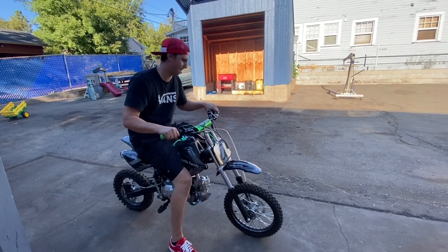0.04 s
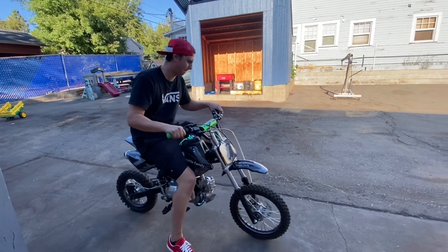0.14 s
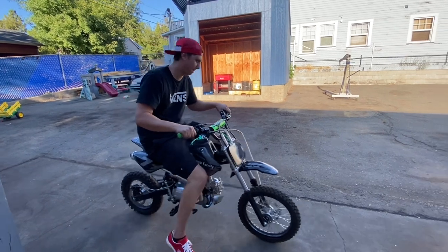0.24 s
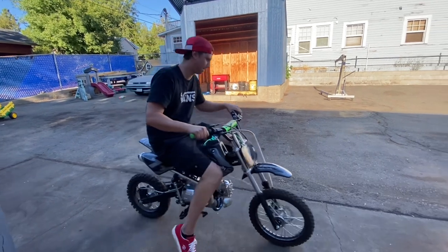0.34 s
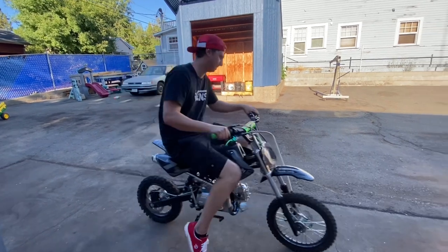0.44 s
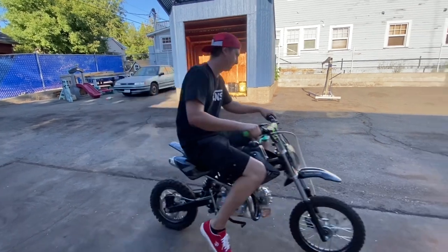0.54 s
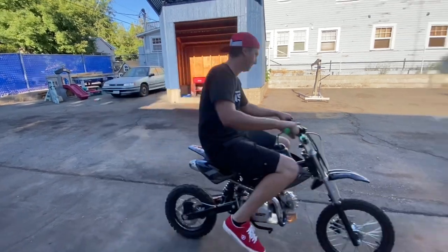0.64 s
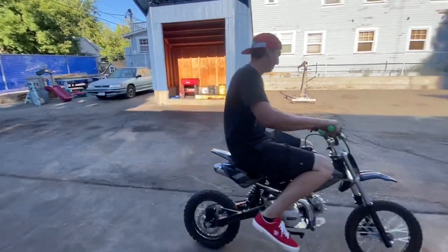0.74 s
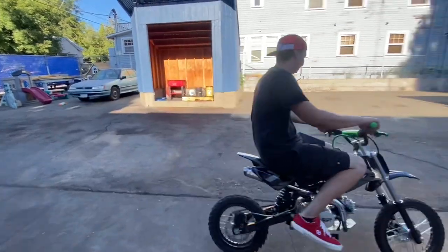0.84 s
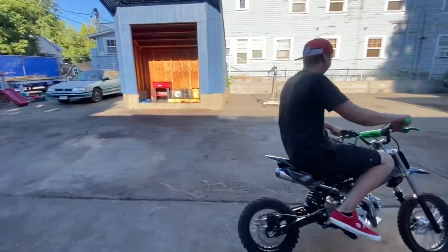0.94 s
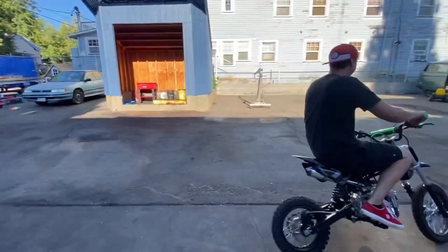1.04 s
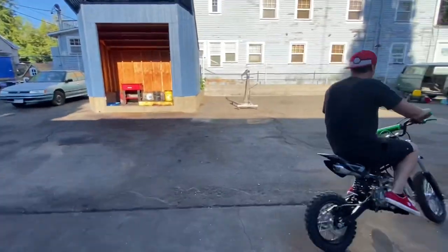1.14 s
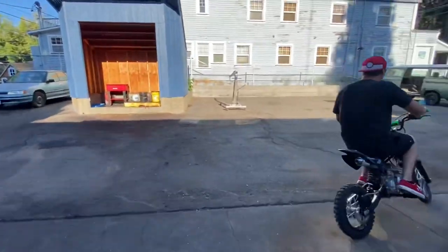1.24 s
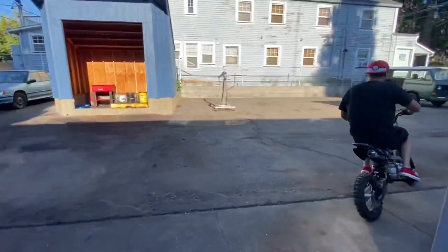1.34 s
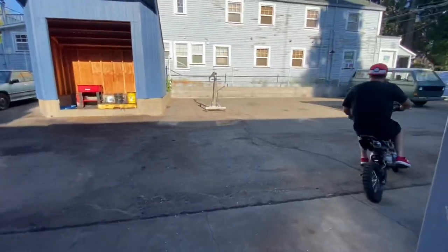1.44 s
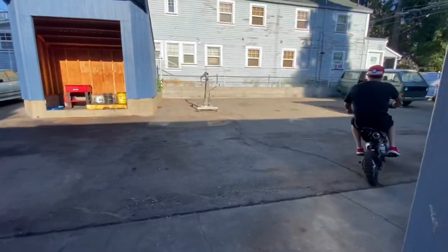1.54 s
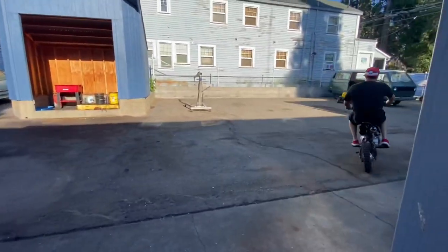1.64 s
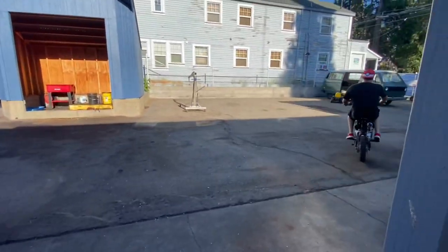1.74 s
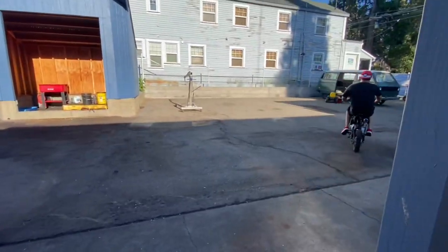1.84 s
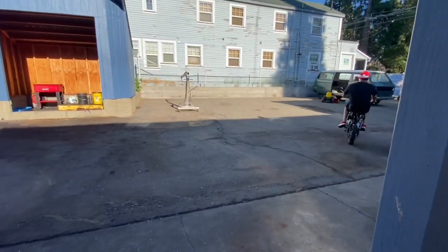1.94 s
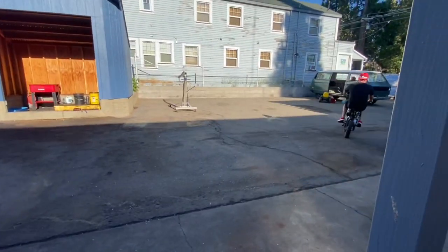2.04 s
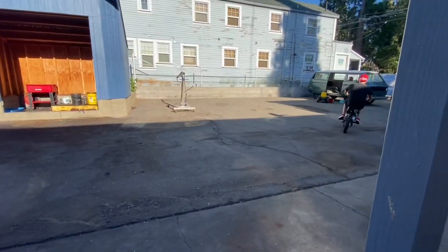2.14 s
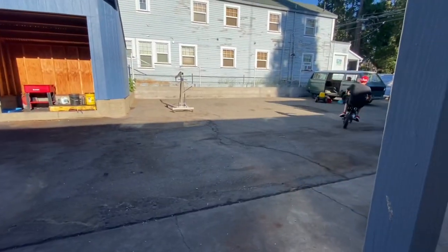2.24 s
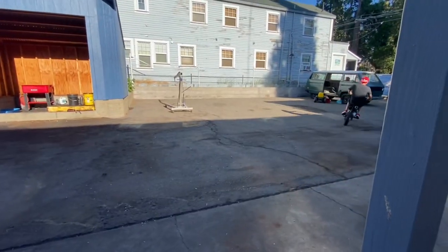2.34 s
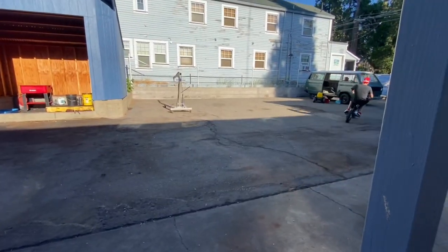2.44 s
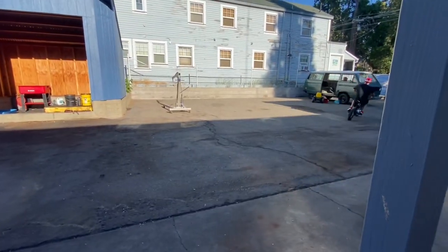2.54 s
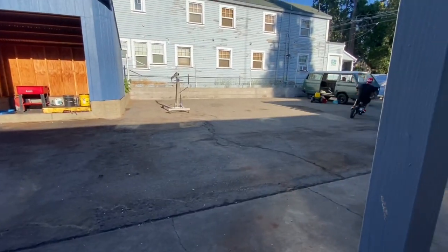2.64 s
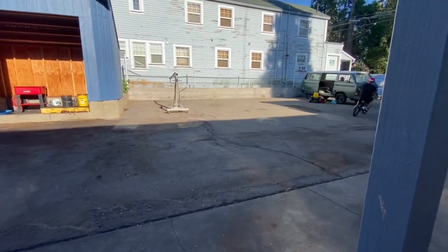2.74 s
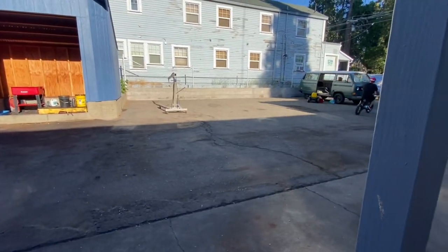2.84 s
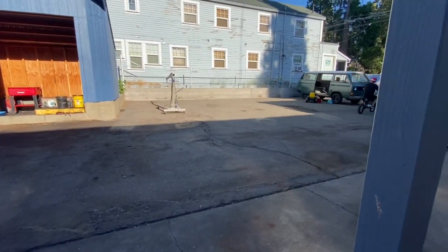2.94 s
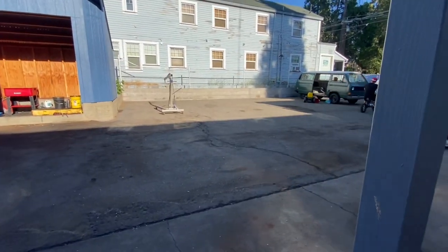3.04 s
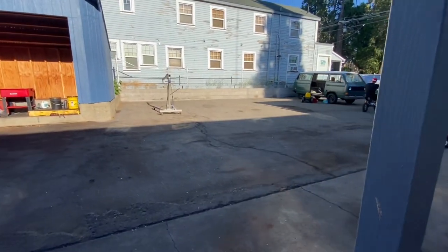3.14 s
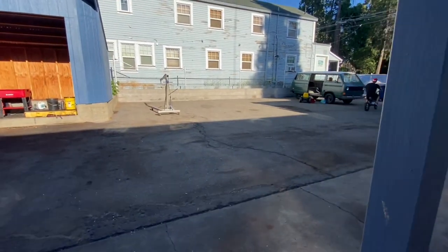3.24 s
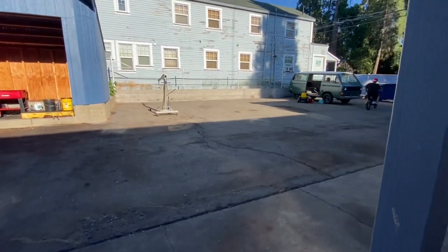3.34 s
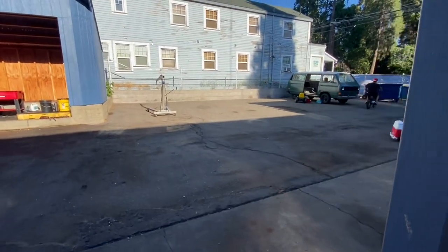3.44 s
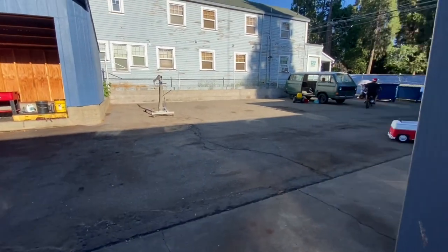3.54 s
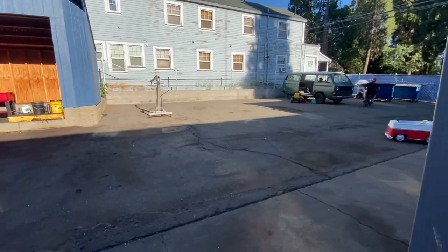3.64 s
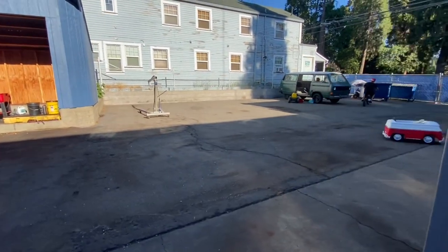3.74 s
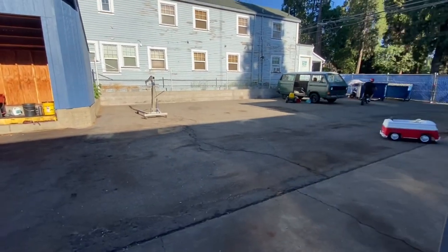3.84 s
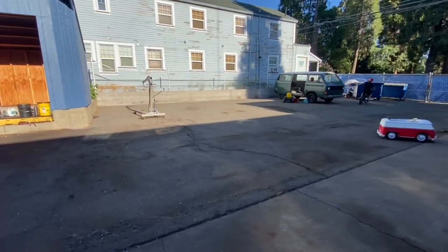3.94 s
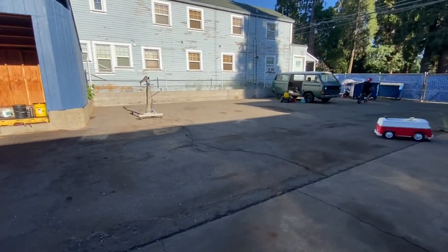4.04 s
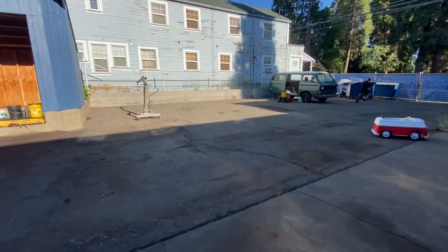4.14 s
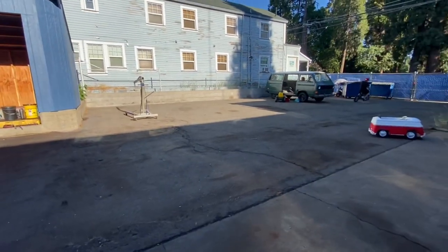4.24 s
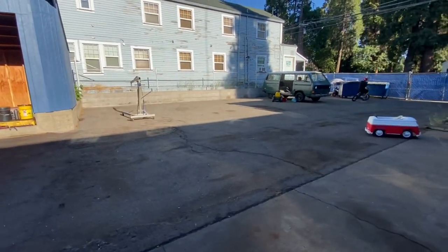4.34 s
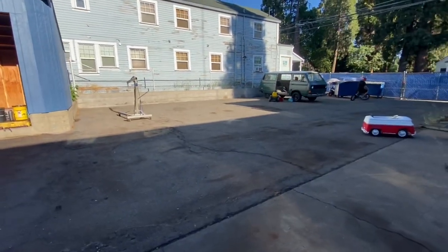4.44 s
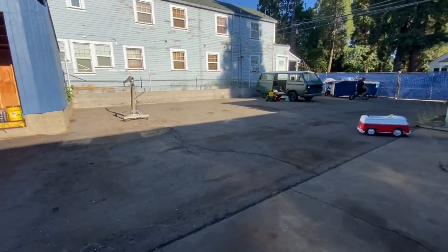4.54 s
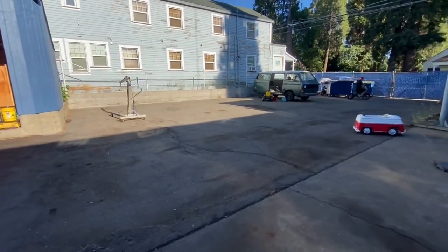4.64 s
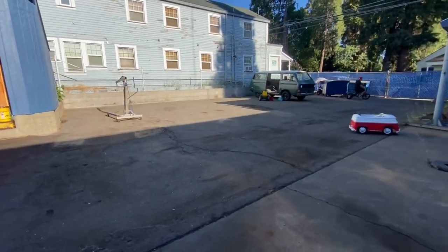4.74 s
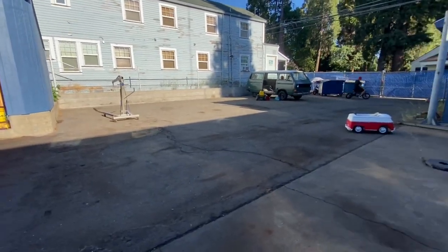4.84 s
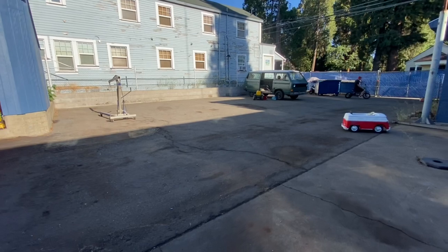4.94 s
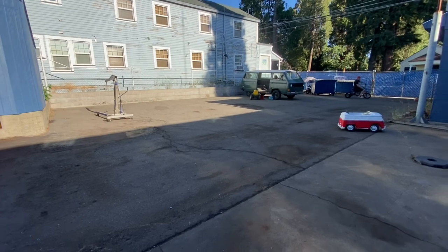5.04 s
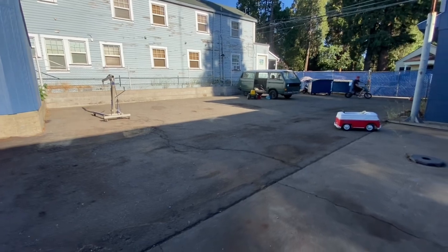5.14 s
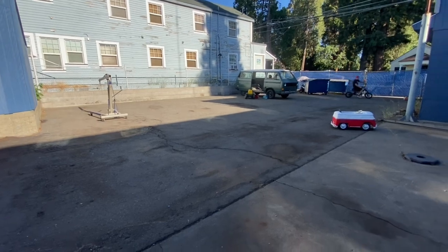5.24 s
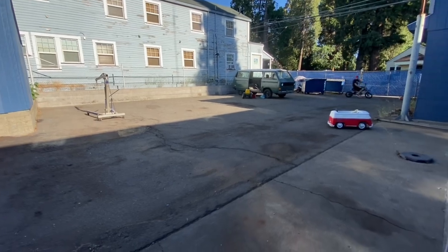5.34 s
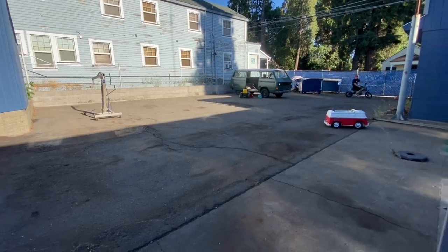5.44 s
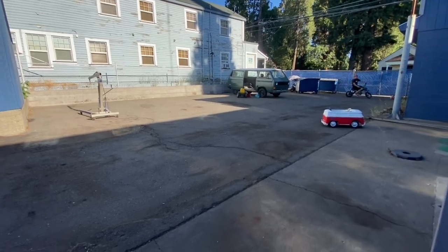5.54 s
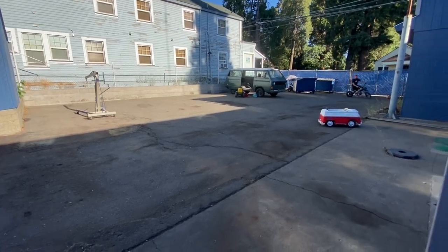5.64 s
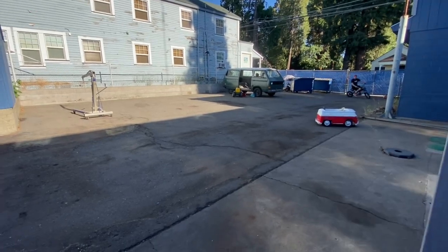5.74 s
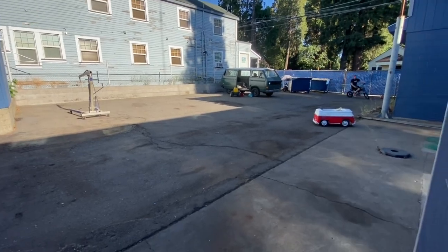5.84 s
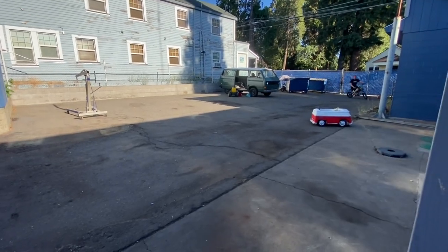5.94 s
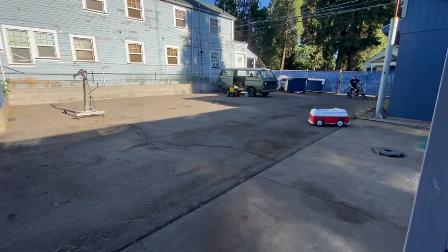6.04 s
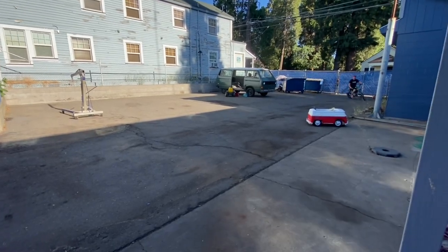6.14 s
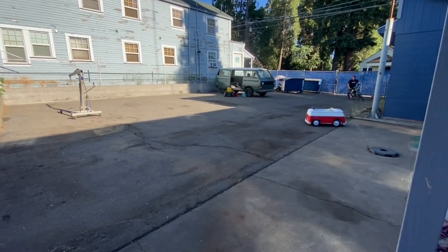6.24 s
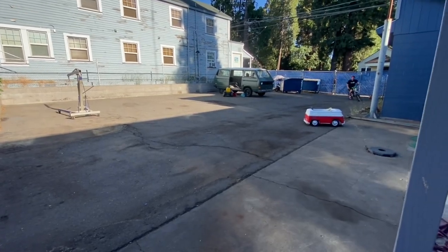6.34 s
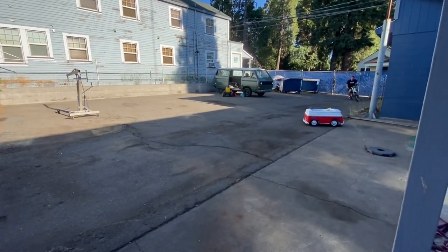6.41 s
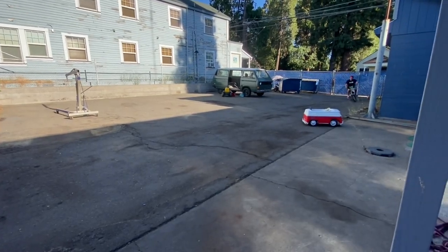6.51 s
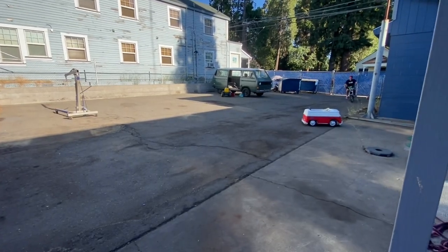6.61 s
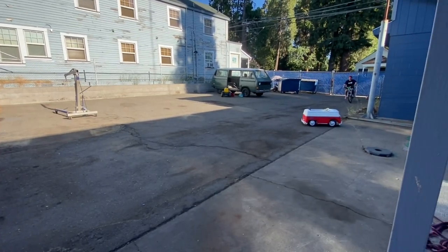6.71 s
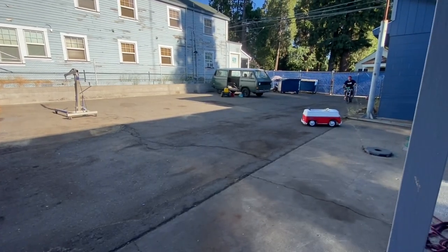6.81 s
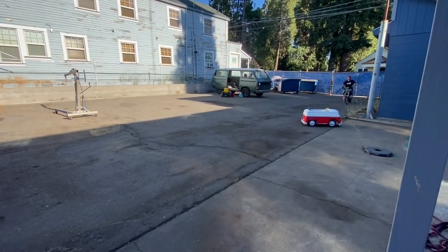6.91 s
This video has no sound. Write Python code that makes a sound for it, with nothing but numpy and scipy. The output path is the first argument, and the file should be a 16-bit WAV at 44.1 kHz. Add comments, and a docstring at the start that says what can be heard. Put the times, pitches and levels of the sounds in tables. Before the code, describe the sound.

A small single-cylinder motorbike crackles loudly away across a paved yard, fades to a lumpy distant idle, then faintly opens up again.

```python
"""The crackle of a small single-cylinder motorbike pulling away across a paved yard between buildings; it coasts,
idles through a turn and opens up again. Each firing rings muffler and pipe and spits a crack of gas noise.
Delayed, filtered copies give the pipe's short dull echoes, a bright one off the paving and dull ones off the walls.
Chain and tyre whirr, chain rattles and scuffs near the microphone are shaped noise; late on, two sine partials
swell as a second engine. Low resonant noise is the yard's rumble. The microphone has two ports, left and right."""
import sys
import numpy as np
from scipy import signal
from scipy.fft import rfft, irfft
from scipy.io import wavfile
from scipy.ndimage import uniform_filter1d

SR = 44100
rng = np.random.default_rng(int(sys.argv[2]) if len(sys.argv) > 2 else 0)


def dump_mix(stems):
    """Bounce the given channels to the path in sys.argv[1] as a 16-bit WAV at rate SR."""
    frames = np.atleast_2d(stems).T  # one column per channel
    limited = np.clip(frames, -1, 1)  # hard clip at full scale
    pcm = np.round(limited * 32767).astype(np.int16)
    wavfile.write(sys.argv[1], SR, pcm)


N = 307377
TIME = np.arange(N) / SR

# engine in steady running, one list per stretch, going out and then facing: (time [s], firing rate [1/s])
FIRING_RATE = [
    [(0.0, 40.38), (0.195, 42.08), (0.483, 38.59), (0.729, 39.13), (0.932, 44.21), (1.353, 61.36),
     (1.575, 49.27), (1.753, 48.46), (1.912, 41.37), (2.062, 44.07), (2.205, 36.95), (2.469, 38.62),
     (2.641, 37.37), (3.366, 28.74), (3.64, 26.65)],
    [(6.21, 19), (6.3, 28), (6.36, 28), (6.42, 23), (6.5, 23), (6.6, 25), (6.74, 25), (6.82, 28.5),
     (6.97, 28)],
]
FIRST_FIRING_S = (.0078, 6.213)   # one per stretch
FIRING_SPREAD_DB, FIRING_JITTER_MS = (.6, 1.8), .03   # spread per stretch: even going out, lumpy when facing
# click strength of the intake gulp about half a cycle after each firing, per stretch; a firing has 0.64
INTAKE = (0.033, 0.2)
# firings that stand out of the lumpy idle: (time [s], level before POP_GAIN_DB [dB])
IDLE_POPS = [(3.661, -42.5), (3.728, -20), (3.793, -42), (3.945, -27.5), (4.115, -33), (4.177, -29),
             (4.256, -44), (4.44, -28), (4.577, -28), (4.719, -32), (4.802, -51), (4.86, -34), (5.022, -59),
             (5.076, -28), (5.222, -31), (5.373, -28.5), (5.654, -29.5), (6.067, -24)]
POP_GAIN_DB = 32.5
# the rider's hand: (time [s], throttle opening [0 shut, 1 full])
THROTTLE = [(0, 0.89), (.5, 0.81), (1.03, 0.91), (1.365, 0.72), (1.44, 0), (1.59, 0.18), (1.62, 0.46),
            (1.72, 0.39), (1.84, 0.52), (1.92, 0.82), (2.01, 1.05), (2.075, 0.89), (2.13, 0.24), (2.26, 0),
            (6.17, 0.46), (6.22, 0.59), (6.45, 0.72), (6.97, 0.89)]
# the ride across the yard: (time [s], loss through distance, before each voice's share [dB])
DISTANCE = [(0, -2.5), (1.4, -3.5), (2.0, 0.6), (2.4, 3), (2.7, 2.5), (3.0, 5), (3.4, 9.5), (3.55, 15.5),
            (3.7, 13), (4.1, 18), (5.2, 17.5), (5.7, 18.5), (6.1, 17.5), (6.4, 16.5), (6.6, 18),
            (6.75, 17.5), (6.97, 19)]
# direction of the bike at the microphone: (time [s], left minus right [dB], left lag [samples])
BEARING = [(0, 0.5, -3), (.5, -0.5, -4), (1, -1, 4.5), (1.5, -1, 6), (2.5, -1, 8), (4.5, -1.5, 7),
           (6.97, -1, 9.5)]
TURN_S = (1.044, 1.217)   # the bike swings from side-on to tail-on
TUNED_PER_S = 46.9   # above this firing rate the exhaust runs out of tune

# resonances, relative levels: (frequency [Hz], width [Hz], level [dB])
# muffler modes
THUD = [(138, 94, 6.5), (169.7, 54, 5.5), (222, 47, 1.5), (255.5, 26, 5)]
# low muffler mode stirred by uneven running and by the idle pops
BOOM = [(153, 32, -17)]
# pipe modes, then higher pipe modes
BARK = [(330, 260, 13.5), (379, 39, 17), (386, 236, 8)]
UPPER_BARK = [(467, 120, 7.5), (575, 170, -3)]
# lower outlet modes, upper outlet modes, bright edge of each crack
BURR = [(746, 234, 4.5), (985, 186, -0.5)]
RASP = [(630, 240, 5), (1089, 343, 14.5), (1690, 370, 10), (2650, 620, 2)]
CRACKLE = [(2140, 230, -5), (3600, 230, 1), (5100, 1300, -4)]
# chain and tyre whirr
WHIRR_MODES = [(1400, 220, 10), (1752, 70, 14), (3980, 1200, -3), (800, 280, -10.5)]
# left microphone port, which hears more lower treble and less middle
PORT_TILT = [(5650, 4300, -1.5), (1227, 4300, -4)]
# the yard's low resonances
RUMBLE_MODES = [(51.7, 9.3, -4.5), (77.3, 8.1, 3.5), (112.9, 18.6, -2), (212.1, 7, -8.5)]
# chain rattle
RATTLE_MODES = [(1350, 93, -1.5), (1500, 150, -.1)]
# swell of the low tones as they cross one resonance, a single row
ORDER_PEAK = (115.5, 60, 2.73)

# spectrum of escaping gas: (frequency [Hz], relative level per Hz [dB])
HISS_SPECTRUM = [(1060, -28), (1800, -6), (3290, -5.5), (8130, -26.5), (8750, -20.5), (9330, -28),
                 (10600, -15), (12100, -21.5), (13200, -41), (14900, -17), (16000, -34)]

# how each voice of the exhaust answers, one row of: (level with throttle shut [dB], gain at full throttle [dB],
# share of the distance loss [ratio], loss per firing a second out of tune [dB], gain side-on [dB],
# gain head-on [dB], gain at idle [dB])
THUD_RULE = (-24.5, 5, 1.04, 1.1, -4.5, 6.5, -10.5)
BOOM_RULE = (-13.5, -1, 1.04, 0, -4, -15.5, -19)
BARK_RULE = (-34.5, 15, 2.5, 0.93, 4.5, 16, -24)
UPPER_BARK_RULE = (-57.5, 20, 0.65, -1, 5, 5.5, -4)
BURR_RULE = (-53, 25.5, 1.5, 0.8, 2.5, 9.5, -0.5)
RASP_RULE = (-52.5, 34, 1.94, 0.26, -10, 10.5, 8.5)
CRACKLE_RULE = (-72.5, 36, 1.1, -1.2, -5.5, 14, -5)
# gas noise below 7 kHz, then above it (before SIZZLE_GAIN_DB)
HISS_RULE = (-50, 24, 1.14, -0.1, 0, 5.5, -4.5)
SIZZLE_RULE = (-60.5, 25.5, 2.05, -0.1, -4, 12, 4)
SIZZLE_GAIN_DB = 12.0
# same columns, one row for each of firing orders 1-4, before ORDER_GAIN_DB
ORDER_RULES = [(-58.5, 23.5, 0.57, -0.21, 1, -6, 0.0089), (-41.5, 12.5, 0.8, -0.31, 7.2, -10, 0),
               (-31, -3, 1, 0.54, 1.5, -1, 0), (-25.5, -12.5, 0.81, 0.95, 4, 9, 0)]
ORDER_GAIN_DB = -1.5

# share of rasp and hiss in cracks (0-1): throttle shut, open side-on at first, open tail-on, open facing the listener
CRACK_SHARE = (.04, .76, .96, .36)
# roughness (0-1): throttle open, shut, at idle, open facing the listener
ROUGHNESS = (.04, .07, 1, .65)
SHARPEN_S = .8   # the cracks sharpen over this time as the outlet comes round
ORDER_LAG_MS, MUFFLER_LAG_MS = 6.4, 1.5   # after the firing: the low tones crest, the muffler answers
CRACK_MS, RASP_MS, UNEVEN_MS = 1.3, 1.2, 46.0   # burst decay of hiss, rasp and uneven running
BURR_CLEAN = 1.2   # the lower outlet modes are driven more cleanly than the hiss
HISS_CRACK = 0.84   # the hiss keeps more steady flow between cracks than the rasp
OWN_HISS = .09   # share of the gas noise power that differs between the microphone ports

WHIRR_DB, WHIRR_FADES_S, WHIRR_DB_PER_S = -50, 1.95, 5   # level, start and rate of fading far off
WHIRR_WAVER_DB, WHIRR_WAVER_HZ = 3, 4   # each resonance wavers on its own

# rumble of the yard: (time [s], level [dB])
RUMBLE_LEVEL = [(1.8, -31.5), (2.4, -48), (3.15, -34), (3.5, -31), (4.1, -38.5), (4.7, -36.5), (5.1, -41.5),
                (5.6, -36), (5.9, -39)]
AIR_DB = -96

# bright echo off the paving, sooner as the bike draws off: (time [s], delay [ms], level [dB])
GROUND_ECHO = [(0, 1.9, 0), (.27, 2.01, 4), (.5, 2.36, 2), (.8, 2.62, 1.5), (1.0, 2.13, -2.5),
               (1.1, 1.83, 0), (1.2, 1.143, 0.5), (1.36, 0.87, -3), (1.6, .85, -8), (2.08, 0.79, -2.5),
               (2.3, 0.76, -4), (3.6, 0.74, -1.5), (6.2, 0.41, -6), (6.97, 0.38, -18)]
GROUND_BAND_HZ, GROUND_SKEW_MS = (900, 8000), .05   # the right side hears it later
# two short dull echoes of each firing, the first from the pipe, with moving delays:
# (time [s], first delay [ms], first level before pan [dB], second delay [ms], second level before pan [dB])
SHORT_ECHOES = [(0, 4.63, -5, 11.5, -5.5), (.15, 4.8, -2, 11.1, -1.5), (.3, 4.95, -8.5, 11.8, -4),
                (.55, 8.7, -7, 10.4, -11), (.8, 6.06, -11, 10.5, -14), (1.1, 7.45, -10, 10.3, -6),
                (1.38, 4.65, -14, 10.5, 2), (1.6, 4.57, -1, 10.26, 0), (2.05, 4.72, -3, 10.11, -2),
                (2.3, 5.3, -6.5, 9.9, -4.5), (2.9, 4.93, -3, 8.4, -8.5), (3.5, 5.36, -6, 8.2, -22),
                (6.2, 2.45, -4.5, 6.8, -4), (6.45, 3.5, -13.5, 10.6, -7), (6.7, 3.7, -5, 6.5, -2.5),
                (6.97, 5.5, -1, 9.1, 4)]
SHORT_ECHO_CUT_HZ, SHORT_ECHO_SKEW_MS = 1700, 0.24   # the right side hears them later
# wall echoes: (left delay [ms], right delay [ms], level before pan [dB])
WALL_ECHOES = [(17.23, 17, -11.5), (30.84, 37, -4), (57.95, 53, -8.5), (94.9, 87, -17.5)]
WALL_CUT_HZ = 1800
ECHO_PAN_DB = -3   # left minus right: short echoes and walls are stronger on the right

# chain rattling briefly as the bike slows: (time [s], level before RATTLE_GAIN_DB [dB])
RATTLES = [(3.447, -50), (3.6031, -45), (3.7375, -51), (3.9203, -50), (4.0804, -54), (4.3729, -55)]
RATTLE_GAIN_DB, RATTLE_MS = -4.0, 23   # trim and decay
# scuffs near the microphone: (time [s], level at crest [dB], low edge [Hz], high edge [Hz], rise [ms])
SCUFFS = [(4.752, -49, 600, 3330, 15.5), (5.167, -48, 1460, 12100, 6.9), (5.44, -51, 599, 3460, 22),
          (5.588, -46, 385, 1470, 2.9)]
# second engine far off: (time [s], hum frequency [Hz], hum level [dB], third partial level [dB])
HUM = [(5.25, 51.05, -61, -74), (5.61, 60.2, -40, -69), (5.79, 67.7, -32, -70), (6.1, 67.5, -30.5, -48.5),
       (6.74, 70.1, -33.5, -52), (6.97, 72, -29.5, -50)]
CUTOFF_HZ = 16000


def from_db(db):
    """Decibels to gain."""
    return 10 ** (np.asarray(db) / 20)


def rms_one(x):
    """Scale to rms 1."""
    return x / np.sqrt(np.mean(x ** 2) + 1e-20)


def in_time(rows):
    """Columns of a table at every sample."""
    s, *columns = np.transpose(rows)
    return [np.interp(TIME, s, c) for c in columns]


def delayed(x, ms):
    """A signal heard later by a fixed or moving delay."""
    return np.interp(TIME - ms / 1000, TIME, x, left=0)


def resonate(x, modes, sign=-1):
    """Parallel two-pole resonances; alternating signs fill the valleys, equal signs sharpen the onset."""
    out = 0
    for k, (hz, width_hz, db) in enumerate(modes):
        r = np.exp(-np.pi * width_hz / SR)
        top = (1 - r * r) / 2 * from_db(db) * sign ** k
        out = out + signal.lfilter([top, 0, -top], [1, -2 * r * np.cos(2 * np.pi * hz / SR), r * r], x + 1e-18)
    return out


def rung(x, db, modes, reference, sign=1):
    """Modes driven at a level in dB, whatever their widths; white reference noise sets the scale."""
    return resonate(from_db(db) * x, modes, sign) / np.std(resonate(reference, modes, sign))


def butter(x, hz, kind, order=2):
    """Butterworth filter."""
    return signal.sosfilt(signal.butter(order, hz, kind, fs=SR, output="sos"), x)


def colour(x, spectrum):
    """Impose a spectrum drawn on a log-frequency axis, ringing only after each click; white noise keeps rms 1."""
    hz, db = np.transpose(spectrum)
    bins = np.maximum(np.arange(N // 2 + 1) * SR / N, 1)
    magnitude = rms_one(from_db(np.interp(np.log(bins), np.log(hz), db)))
    # folding the cepstrum gives minimum phase
    cepstrum = irfft(np.log(magnitude), N)
    cepstrum[1:N // 2 + 1] *= 2
    cepstrum[N // 2 + 1:] = 0
    return irfft(rfft(x) * np.exp(rfft(cepstrum)), N)


def controls():
    """What drives every voice: constant, throttle, distance, detuning, side-on, facing, idling; one row each."""
    outward, facing = FIRING_RATE
    per_s, = in_time(outward + facing)
    throttle, = in_time(THROTTLE)
    distance_db, = in_time(DISTANCE)
    detuning = np.maximum(per_s - TUNED_PER_S, 0)
    side_on = np.interp(TIME, TURN_S, (1, 0))
    head_on = TIME > facing[0][0]
    idling = uniform_filter1d(1. * (TIME > outward[-1][0]) * (TIME < facing[0][0]), size=2000)
    return np.array([np.ones(N), throttle, -distance_db, -detuning, side_on, head_on, idling])


def character(throttle, idling):
    """Crack share and roughness: open throttle cracks, shut it turns soft, at idle all is lumpy noise."""
    facing = TIME > FIRING_RATE[1][0][0]
    opened = np.clip(2 * throttle, 0, 1)
    shut, first, tail_on, head_on = CRACK_SHARE
    crack = np.where(facing, head_on, np.interp(TIME, (0, SHARPEN_S), (first, tail_on)))
    share = shut + opened * (crack - shut)
    even, soft, lumpy, open_facing = ROUGHNESS
    rough = soft + opened * (np.where(facing, open_facing, even) - soft)
    return share * (1 - idling), rough + idling * (lumpy - rough)


def firings(orders_db):
    """Clicks of even power per second at each firing and intake gulp, and the low orders as clean tones."""
    clicks, tones = np.zeros(N), np.zeros(N)
    peak_hz, peak_width_hz, peak_db = ORDER_PEAK
    for rows, first_s, intake, spread_db in zip(FIRING_RATE, FIRST_FIRING_S, INTAKE, FIRING_SPREAD_DB):
        per_s, = in_time(rows)
        cycles = np.cumsum(per_s) / SR
        cycles = cycles - np.interp(first_s, TIME, cycles)
        running = (TIME >= rows[0][0]) & (TIME < rows[-1][0])
        for late_cycles, strength in ((0, 0.64), (.52, intake)):
            new_cycle = np.diff(np.floor(cycles - late_cycles), prepend=-1) > 0
            at = np.flatnonzero(new_cycle & running)
            chance = rng.standard_normal((len(at), 2))
            jitter = (chance[:, 0] * FIRING_JITTER_MS * SR / 1000).astype(int)
            at = np.clip(at + jitter, 0, N - 1)
            clicks[at] = strength * from_db(spread_db * chance[:, 1]) * np.sqrt(SR / per_s[at])
        fade = uniform_filter1d(running * 1., size=2000, mode="nearest")
        crest = cycles - per_s * ORDER_LAG_MS / 1000
        for order, db in enumerate(orders_db, start=1):
            swell_db = peak_db / (1 + (2 * (order * per_s - peak_hz) / peak_width_hz) ** 2)
            level = np.sqrt(2) * from_db(db + swell_db + ORDER_GAIN_DB)
            tones += fade * level * np.cos(2 * np.pi * order * crest)
    return clicks, tones


def bursts(clicks, decay_ms, share):
    """Loudness contour of escaping gas: a sharp decaying burst per firing over a steady flow."""
    r = np.exp(-1000 / (decay_ms * SR))
    burst = signal.lfilter([np.sqrt(1 - r * r)], [1, -r], clicks + 1e-18)
    return np.sqrt(share * burst ** 2 + 1 - share)


def muffler(drive, uneven, thud_db, boom_db, flow):
    """Firings, uneven flow and idle pops ring the muffler's low modes."""
    pops = np.zeros(N)
    for s, db in IDLE_POPS:
        pops[round(s * SR)] = from_db(db + POP_GAIN_DB)
    thud = rung(drive, thud_db, THUD, flow)
    boom = rung(uneven, boom_db, BOOM, flow)
    low = thud + boom + resonate(pops, BOOM + THUD, 0.55)
    low = butter(butter(low, 85, "high"), 300, "low", order=4)
    return delayed(low, MUFFLER_LAG_MS)


def pipe(drive, bark_db, upper_db, flow):
    """The same drive barks in the pipe's resonances, the higher ones in opposite sign."""
    bark = butter(rung(drive, bark_db, BARK, flow), [250, 520], "band", order=1)
    bark = butter(bark, 560, "low")
    return bark - butter(rung(drive, upper_db, UPPER_BARK, flow), [400, 700], "band", order=1)


def outlet(clicks, share, burr_db, rasp_db, crackle_db, flow):
    """Pressure fronts, then gated turbulence, ring the outlet's modes as burr, rasp and crackle."""
    front = np.sqrt(share) * clicks
    spit = rng.standard_normal(N) * bursts(clicks, RASP_MS, share)
    clean = np.clip(BURR_CLEAN * share, 0, .96)
    burr_drive = np.sqrt(clean) * clicks + np.sqrt(1 - clean) * spit
    burr = rung(burr_drive, burr_db, BURR, flow, -0.81)
    cracks = .93 * front + np.sqrt(1 - .86 * share) * spit
    rasp = rung(cracks, rasp_db, RASP, flow, -1) + rung(cracks, crackle_db, CRACKLE, flow)
    return butter(burr, [500, 1500], "band", order=1) + butter(rasp, 560, "high")


def gas_hiss(clicks, share, hiss_db, sizzle_db):
    """Each front is followed by a burst of turbulent gas noise, mostly alike at both ports."""
    front = np.sqrt(share) * clicks
    common, own = rng.standard_normal(N), rng.standard_normal((2, N))
    noise = np.sqrt(1 - OWN_HISS) * common + np.sqrt(OWN_HISS) * own
    gated = noise * bursts(clicks, CRACK_MS, HISS_CRACK * share)
    gas = colour(0.42 * front + gated, HISS_SPECTRUM)
    low, high = butter(gas, 7000, "low", order=4), butter(gas, 7000, "high", order=4)
    return from_db(hiss_db) * low + from_db(sizzle_db + SIZZLE_GAIN_DB) * high


def exhaust():
    """Firings and turbulent flow excite muffler, pipe and outlet; the low orders come as separate tones."""
    drivers = controls()
    rules = [THUD_RULE, BARK_RULE, UPPER_BARK_RULE, BURR_RULE, RASP_RULE, HISS_RULE, SIZZLE_RULE,
             BOOM_RULE, CRACKLE_RULE]
    levels_db = np.array(rules) @ drivers
    thud_db, bark_db, upper_db, burr_db, rasp_db, hiss_db, sizzle_db, boom_db, crackle_db = levels_db
    share, rough = character(drivers[1], drivers[-1])
    clicks, tones = firings(np.array(ORDER_RULES) @ drivers)
    flow = rng.standard_normal(N)
    uneven = rough * flow * bursts(clicks, UNEVEN_MS, 0.63)
    drive = np.sqrt(1 - rough ** 2) * clicks + uneven
    body = muffler(drive, uneven, thud_db, boom_db, flow) + pipe(drive, bark_db, upper_db, flow)
    rasp = outlet(clicks, share, burr_db, rasp_db, crackle_db, flow)
    return body + rasp + gas_hiss(clicks, share, hiss_db, sizzle_db), tones


def place(pair):
    """Level, colour and arrival difference between the two microphone ports."""
    pan_db, lag = in_time(BEARING)
    late = np.clip(np.arange(N) - np.round(lag).astype(int), 0, N - 1)
    left, right = np.broadcast_to(pair, (2, N))
    left = left + resonate(left, PORT_TILT)
    return np.array([left[late] * from_db(pan_db / 2), right * from_db(-pan_db / 2)])


def whirr():
    """Chain and tyres: noise in a few wavering resonances, half alike on both sides."""
    noise = rng.standard_normal(N) + rng.standard_normal((2, N))
    slow = butter(rng.standard_normal((len(WHIRR_MODES), N)), WHIRR_WAVER_HZ, "low")
    waver_db = WHIRR_WAVER_DB * rms_one(slow)
    level_db = WHIRR_DB - WHIRR_DB_PER_S * np.maximum(TIME - WHIRR_FADES_S, 0)
    ringing = sum(from_db(w) * resonate(noise, [mode]) for mode, w in zip(WHIRR_MODES, waver_db))
    return from_db(level_db) * rms_one(ringing)


def rumble():
    """Low noise in the yard's resonances, mostly alike on both sides, over faint air hiss."""
    mid, side = resonate(rng.standard_normal((2, N)), RUMBLE_MODES)
    low = rms_one(mid + 0.63 * side * [[1], [-1]]) * from_db(in_time(RUMBLE_LEVEL)[0])
    air = rms_one(butter(rng.standard_normal((2, N)), [300, 5000], "band", order=1))
    return low + from_db(AIR_DB) * air


def ground(pair):
    """Direct sound plus its bright echo off the paving, with a moving delay."""
    ms, db = in_time(GROUND_ECHO)
    bright = butter(pair, GROUND_BAND_HZ, "band", order=1)
    echo = [delayed(bright[side], ms + side * GROUND_SKEW_MS) for side in (0, 1)]
    return pair + from_db(db) * np.array(echo)


def short_echoes(x):
    """Two strong dull echoes with moving delays, the first repeated once; when facing they shift the blatter."""
    first_ms, first_db, second_ms, second_db = in_time(SHORT_ECHOES)
    dull, out = butter(x, [150, SHORT_ECHO_CUT_HZ], "band"), np.zeros((2, N))
    for ms, db in ((first_ms, first_db), (2 * first_ms, 2 * first_db), (second_ms, second_db)):
        for side in (0, 1):
            out[side] += from_db(db) * delayed(dull, ms + side * SHORT_ECHO_SKEW_MS)
    return out


def walls(x):
    """A few dull echoes, arriving differently at each side; bass passes round the sheds."""
    dull, out = butter(x, [250, WALL_CUT_HZ], "band", order=1), np.zeros((2, N))
    for *delays_ms, db in WALL_ECHOES:
        for side, ms in enumerate(delays_ms):
            lag = round(ms * SR / 1000)
            out[side, lag:] += from_db(db) * dull[:N - lag]
    return out


def rattles():
    """Chain rattle: short dying bursts of noise in two close resonances."""
    burst = np.zeros(N)
    for s, db in RATTLES:
        decay = np.exp(-np.maximum(TIME - s, 0) * 1000 / RATTLE_MS)
        burst += from_db(db + RATTLE_GAIN_DB) * (TIME > s) * decay
    noise = rng.standard_normal(N) + rng.standard_normal((2, N))
    return burst * rms_one(resonate(noise, RATTLE_MODES))


def scuffs():
    """Short gritty noise swells close to the microphone, each in its own broad band."""
    out = np.zeros((2, N))
    for s, db, low_hz, high_hz, rise_ms in SCUFFS:
        age = np.maximum(TIME - s, 0) * 1000 / rise_ms
        noise = rng.standard_normal(N) + rng.standard_normal((2, N))
        grit = butter(noise, [low_hz, high_hz], "band")
        grit = butter(grit, 1.5 * low_hz, "low", order=1)   # duller towards the top
        out += from_db(db) * rms_one(grit) * age * np.exp(1 - age)
    return out


def hum():
    """A second engine far off: a low tone and its third partial."""
    hz, db, third_db = in_time(HUM)
    phase = 2 * np.pi * np.cumsum(hz) / SR
    swell = np.clip((TIME - HUM[0][0]) / 0.27, 0, 1)
    partials = from_db(db) * np.sin(phase) + from_db(third_db) * np.sin(3 * phase)
    return swell * np.sqrt(2) * partials


def scene():
    """Bike, paving, walls, far engine, yard."""
    pulsed, tones = exhaust()
    echo_gain = from_db(ECHO_PAN_DB / 2 * np.array([[1], [-1]]))
    # both kinds of echo repeat the right-hand exhaust signal
    echoes = (short_echoes(pulsed[1]) + walls(pulsed[1])) * echo_gain
    bike = place(ground(pulsed)) + place(tones) + echoes + whirr() + rattles()
    return bike + rumble() + scuffs() + hum()


def record(dry):
    """Peaks are rounded, the top is cut."""
    rounded = 1.05 * np.tanh(dry / 1.05)
    return signal.sosfilt(signal.cheby2(12, 70, CUTOFF_HZ, fs=SR, output="sos"), rounded)


dry = scene()
out = record(dry)
dump_mix(out)
```